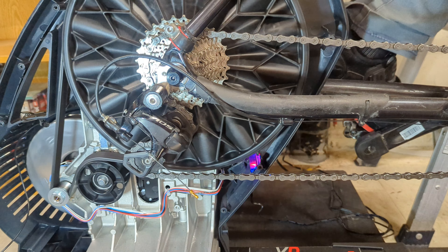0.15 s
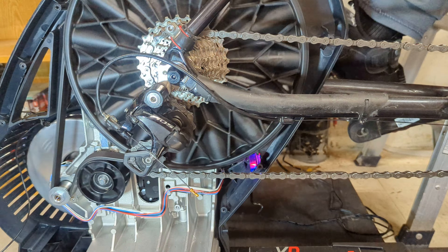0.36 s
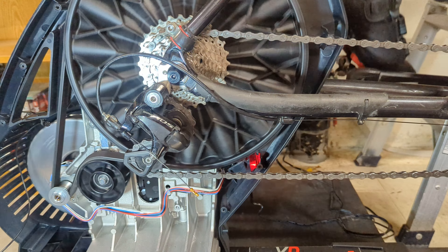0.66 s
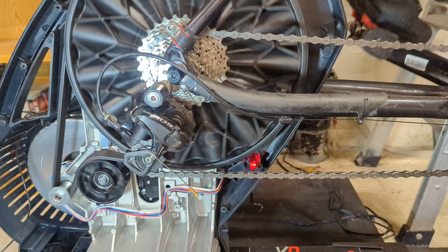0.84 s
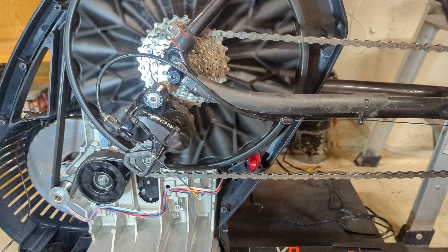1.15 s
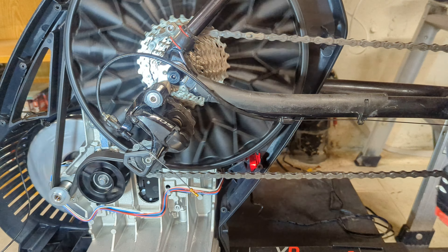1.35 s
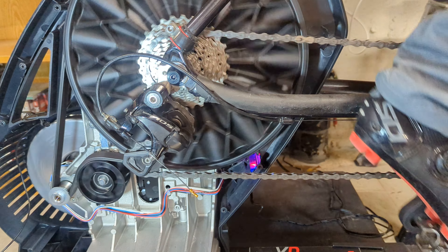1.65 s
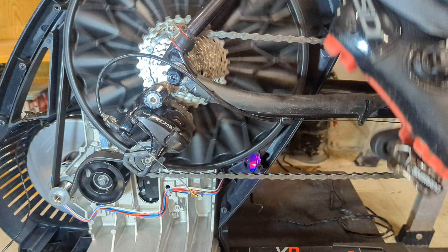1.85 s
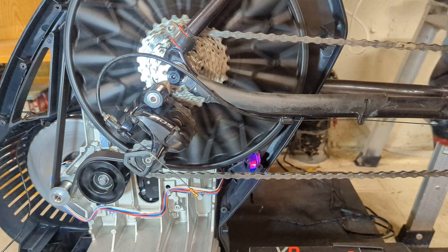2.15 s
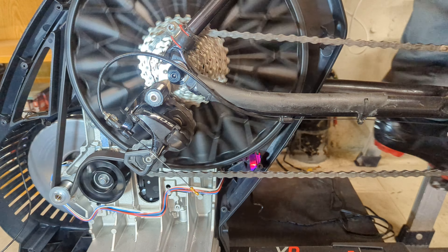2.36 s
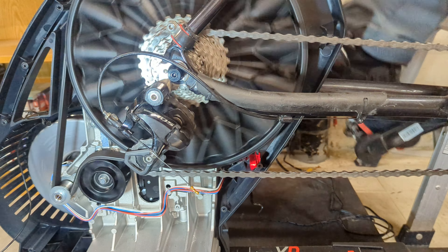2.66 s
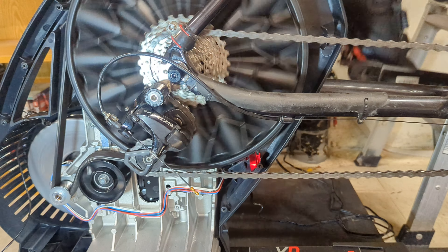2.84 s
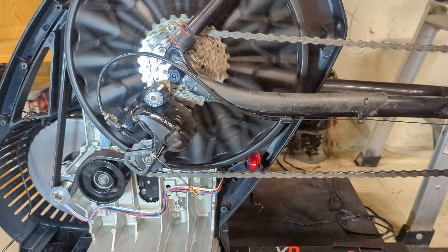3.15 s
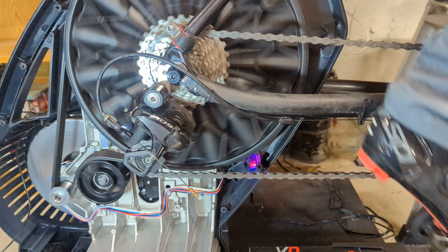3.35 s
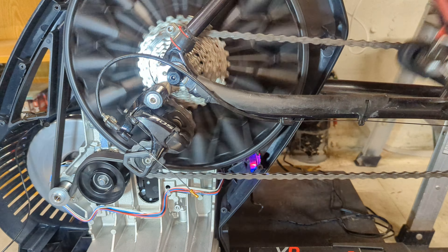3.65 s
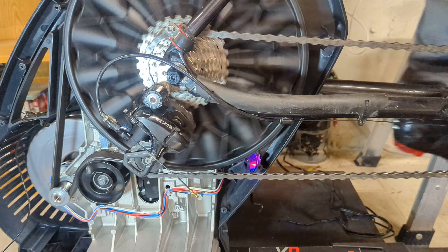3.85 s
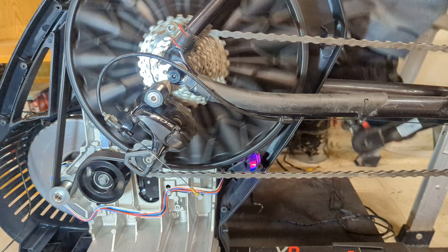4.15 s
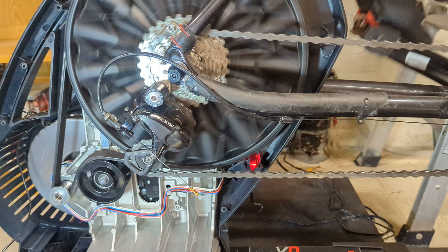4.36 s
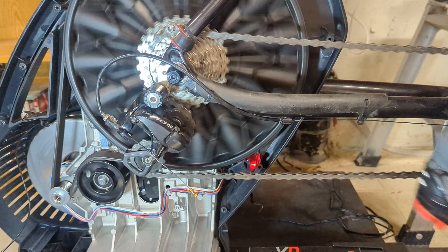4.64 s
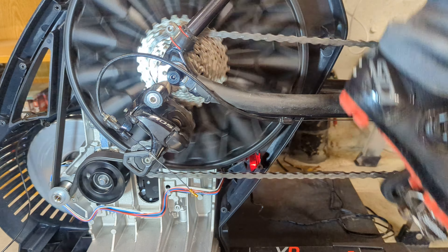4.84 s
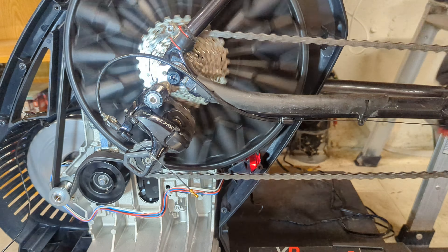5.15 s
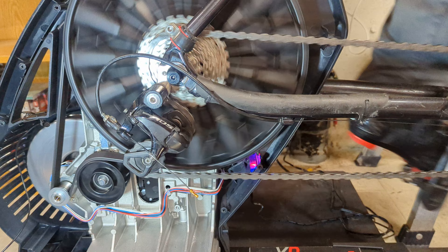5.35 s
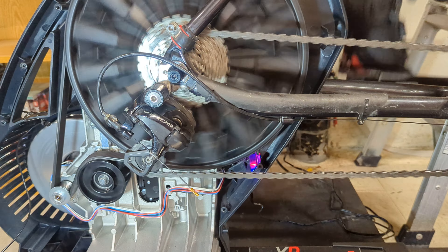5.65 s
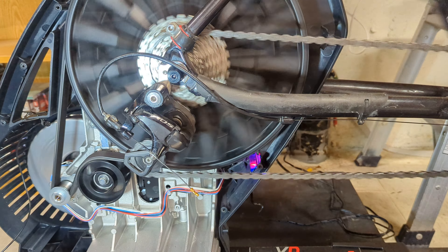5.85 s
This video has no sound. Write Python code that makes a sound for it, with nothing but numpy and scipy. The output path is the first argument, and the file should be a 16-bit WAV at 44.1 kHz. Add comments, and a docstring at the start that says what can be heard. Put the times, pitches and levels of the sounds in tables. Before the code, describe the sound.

Close to the rear drive of a stationary bicycle indoors: a cluster of hard clacks and a metallic crack open over faint air noise. Grinding fades in, surges unevenly and settles into a steady, grainy whirr. Muffled double knocks come around five a second, among chain clinks, tiny ticks and brief squeaks, with short room reflections.

```python
"""A small room, where a bicycle stands on a direct-drive trainer. The pedal clacks as a shoe finds it and the
chain takes up, then the flywheel gathers speed. Belt and chain grind: random contacts excite the resonances of
the housing. The drive knocks softly as damped modes with a rebound; the chain clinks and ticks on the sprockets
and rustles as coloured noise. The frame drones as a narrow resonance, dry metal squeaks briefly as a wavering
tone, and faint air noise and a steady hum lie beneath."""
import sys
import numpy as np
from scipy import signal
from scipy.fft import rfft, irfft
from scipy.io import wavfile

SR = 44100
rng = np.random.default_rng(int(sys.argv[2]) if len(sys.argv) > 2 else 0)


def store_wav(level_fs):
    """Save 16-bit WAV to argv[1]."""
    pcm = np.round(np.clip(np.atleast_2d(level_fs), -1, 1) * 32767)
    wavfile.write(sys.argv[1], SR, pcm.T.astype(np.int16))


N = 264600
TIME = np.arange(N) / SR
SHORT = TIME[:SR // 2]   # half a second, the span of every impulse response
CUTOFF_HZ = 7050   # upper edge of the sound's band

# knocks of the drive, about five a second at speed, plus the thuds that lead into the clacks at 2.04 s and 3.10
# s: start_s, level_db, hollow_overtone_db, rebound_after_s
KNOCK_EVENTS = [(1.202, -47.5, -44.5, 0.02), (1.442, -44, -53.5, .021), (1.785, -32.5, -39.5, 0.019),
                (1.846, -38.5, -46, 0.019), (2.035, -26.5, -25.5, 0.04), (2.131, -36.5, -41, 0.018),
                (2.318, -33, -52.5, 0.017), (2.802, -34, -43, 0.029), (3.097, -27, -27, .021),
                (3.245, -40, -39, .015), (3.427, -44.5, -58, 0.019), (3.627, -32.5, -44, 0.037),
                (3.834, -32, -47, .019), (4.016, -37.5, -58, 0.019), (4.224, -37, -52, 0.018),
                (4.405, -30.5, -50, 0.018), (4.585, -33, -53, 0.022), (4.786, -38, -60, 0.019),
                (4.986, -41, -44, 0.019), (5.126, -31, -40, .021), (5.169, -31, -34.5, 0.017),
                (5.359, -31.5, -43.5, 0.022), (5.504, -37, -46, 0.019), (5.542, -30.5, -37.5, 0.036),
                (5.888, -35, -45, .021), (5.909, -35.5, -38, 0.014)]


def from_db(db):
    """Decibels to amplitude gain: 20 dB per factor of ten."""
    return 10 ** (np.asarray(db) / 20)


def rms_one(x):
    """Normalisation to unit mean power."""
    return x / np.sqrt(np.mean(x ** 2) + 1e-20)


def at_hz(points, hz):
    """Linear interpolation of a curve on a log-frequency axis."""
    f, value = np.transpose(points)
    return np.interp(np.log(np.maximum(hz, 1)), np.log(f), value)


def coloured(x, spectrum):
    """Spectral shaping: each frequency is weighted by a smooth curve, then the rms is set to 1."""
    hz = np.fft.rfftfreq(len(x), 1 / SR)
    gain = from_db(at_hz(spectrum, hz)) * (hz < CUTOFF_HZ + 500)
    return rms_one(irfft(rfft(x) * gain, len(x)))


def drift(rate_hz):
    """Low-passed random fluctuation of rms 1, its amplitude response halved at rate_hz."""
    hz = np.fft.rfftfreq(N, 1 / SR)
    return rms_one(irfft(rfft(rng.standard_normal(N)) / (1 + (hz / rate_hz) ** 2), N))


def dying(t60):
    """Exponential decay by 60 dB in t60 seconds."""
    return np.exp(-np.log(1000) * SHORT / max(t60, 1e-3))


def swell(s, length_s):
    """Gaussian rise and fall around a moment, down to 1/e at length_s either side."""
    return np.exp(-((TIME - s) / length_s) ** 2)


def clicks(times, db):
    """Ideal impact: one impulse per contact."""
    out = np.zeros(N)
    np.add.at(out, np.round(np.asarray(times) * SR).astype(int), from_db(db))
    return out


def grains(per_s, spread_db):
    """Random impulse train: small contacts at chance moments, uneven in size and of either sign."""
    sizes = from_db(spread_db * np.minimum(rng.exponential(1, N), 4)) * rng.choice([-1, 1], N)
    return rms_one(sizes * (rng.random(N) < per_s / SR))


def through(x, response):
    """Linear system: convolution of a signal with an impulse response."""
    return signal.oaconvolve(x, response)[:N]


def room(x, wet_db, t60=0.5):
    """Reverberation: direct sound plus a dense decaying tail that begins after 5 ms."""
    tail = rng.standard_normal(SR // 2) * dying(t60) * (SHORT > .005)
    return x + from_db(wet_db) * through(x, tail / np.linalg.norm(tail))


def ringing(modes):
    """Modal superposition: the decaying sines of a struck part, alternating in sign."""
    out = 0
    for k, (hz, db, t60) in enumerate(modes):
        out = out + (-1) ** k * from_db(db) * dying(t60) * np.sin(2 * np.pi * hz * SHORT)
    return out


def struck(times, levels_db, modes, uneven_db, detune):
    """Modal excitation: each blow feeds the modes in its own proportions and at slightly shifted pitches."""
    out = np.zeros(N + SR // 2)
    for s, level_db in zip(times, levels_db):
        chance = rng.standard_normal((len(modes), 2))
        blow = [(hz * (1 + detune * a), db + level_db + uneven_db * b, t60)
                for (hz, db, t60), (a, b) in zip(modes, chance)]
        start = round(s * SR)
        out[start:start + SR // 2] += ringing(blow)
    return out[:N]


def still_room():
    """Stationary background: coloured air noise and a sum of steady hum tones."""
    # air noise spectrum: pitch_hz, level_db
    still_air = [(25, -9.5), (60, 2), (100, -14), (170, -26.5), (260, 4), (400, -12.5), (1000, -7),
                 (2500, -29), (7000, -48.5)]
    # steady hum: pitch_hz, rms_db
    hum_tones = [(59, -76), (150, -71), (243, -71)]
    hum = sum(np.sqrt(2) * from_db(db) * np.sin(2 * np.pi * (hz * TIME + rng.random()))
              for hz, db in hum_tones)
    return hum + from_db(-61.5) * coloured(rng.standard_normal(N), still_air)


def drone(effort_db):
    """Narrow-band resonance: the flywheel keeps the frame murmuring; now and then it swells into a clear tone."""
    # swells of the frame resonance: centre_s, length_s (before scaling), pitch_hz, level_db
    frame_swells = [(0.007, 0.098, 148, -54), (1.217, 0.037, 149, -56.5), (2.143, 0.089, 149, -45.5),
                    (2.366, 0.062, 145.3, -55), (2.675, 0.043, 152, -49.5), (3.662, 0.06, 150, -52.5),
                    (3.772, 0.034, 140.7, -48), (3.844, .04, 141, -47.5), (3.978, 0.042, 143, -50.5),
                    (4.12, 0.045, 142.5, -50.5), (4.62, 0.039, 140.3, -50.5), (4.792, .08, 144, -49),
                    (5.124, 0.062, 140.5, -46.5), (5.66, 0.2, 152.4, -51)]
    centre_hz, width_hz = 146.8, 6.1
    level_db, follows = -66, 1   # level at zero effort; dB per dB of effort
    phase = 2 * np.pi * centre_hz * TIME
    # two independent drifts in quadrature make a narrow band of noise
    murmur = drift(width_hz) * np.sin(phase) + drift(width_hz) * np.cos(phase)
    tones = 0
    for s, length_s, hz, db in frame_swells:
        tone = np.sin(2 * np.pi * (hz * TIME + rng.random()))
        tones = tones + from_db(db) * swell(s, 0.72 * length_s) * tone
    return from_db(level_db + follows * effort_db) * murmur + np.sqrt(2) * tones


def rattle(gap_s=0.014, length_s=0.015):
    """Repeated impact: loose parts bounce in unevenly spaced aftershocks; an envelope of mean power 1."""
    moments = np.cumsum(rng.uniform(.4, 1.6, size=60) * gap_s)
    age = SHORT - np.r_[0, moments][np.searchsorted(moments, SHORT)]
    return rms_one(.5 + np.exp(-age / length_s))


def clack_colour(hz, thud_db, crack_db, brightness):
    """Contact spectrum: a thud below, a crack above, tilted by the hardness of the contact."""
    # colour common to all clacks: pitch_hz, level_db
    clack_trim = [(35, -2), (120, -2), (200, -7), (400, -7), (650, -7), (1100, -3), (1600, -3.5),
                  (2200, -4), (3200, -2), (4500, -12), (6300, -22.5)]
    thud_top_hz, crack_foot_hz, pivot_hz = 330, 1080, 2720   # thud gives way to crack between the first two
    thud_db_per_octave, crack_db_per_octave = 5.5, -6
    thud = thud_db + thud_db_per_octave * min(np.log2(hz / thud_top_hz), 0)
    khz_above = (hz - pivot_hz) / 1000
    crack = crack_db + crack_db_per_octave * np.log2(hz / pivot_hz) + brightness * khz_above
    return at_hz([(thud_top_hz, thud), (crack_foot_hz, crack)], hz) + at_hz(clack_trim, hz)


def frame_ring(s, thud_db, thud_hz):
    """Selective modal excitation: where a blow lands decides which frame modes ring most."""
    # ringing of the frame: pitch_hz, level_db, t60_s
    frame_modes = [(45.2, -17.5, 0.25), (74, -25.5, 0.24), (102, -12.5, 0.43), (164, -14, 0.27),
                   (206, -7, 0.15), (279.4, -2.5, 0.15), (385.7, 0, 0.067), (425, -3.5, 0.048),
                   (462.5, -10, 0.13), (505, -8, 0.035), (580, -18, 0.097)]
    off_pitch_db_per_octave = -11   # modes far from the thud's pitch ring less
    modes = [(hz, db + off_pitch_db_per_octave * abs(np.log2(hz / thud_hz)), t60)
             for hz, db, t60 in frame_modes]
    return struck([s], [thud_db + 0.5], modes, uneven_db=2.0, detune=0.022)


def clacks():
    """Broadband impact: each hard contact is a short crack, a rattling tail and the ring of frame and metal."""
    # pedal and frame contacts: start_s, thud_db, thud_pitch_hz, crack_db, brightness_db_per_khz
    contacts = [(0.076, -41, 170, -43.5, -6), (0.092, -35, 170, -40, -4), (0.101, -24.5, 420, -39.5, -0.5),
                (0.11, -23.5, 450, -29, -1), (0.135, -26.5, 423, -32.5, 0),
                (0.293, -20.5, 400, -27.5, -0.5), (0.3, -30, 270, -57, 10.5),
                (0.702, -53, 400, -57.5, -5.5), (1.499, -27.5, 185, -53, -8), (1.544, -44, 404, -53, -4),
                (2.04, -23.5, 280, -23, -2), (2.046, -17.5, 373, -32, 5.5), (3.104, -20, 209, -20.5, 4.5)]
    # decay of the first crack: pitch_hz, t60_s
    crack_t60 = [(60, 0.3), (300, 0.01), (1000, 0.038), (2600, 0.034), (6000, 0.063)]
    # level of the tail against the crack: pitch_hz, level_db
    tail_level = [(60, -16.5), (300, -2), (700, -4), (1300, -9.5), (2800, -10.5), (6000, -10.5)]
    # decay of the tail: pitch_hz, t60_s
    tail_t60 = [(60, 0.29), (300, 0.21), (1000, 0.12), (2600, 0.26), (6000, 0.23)]
    # ringing of crank, chain and sprockets: pitch_hz, level_db, t60_s
    metal_modes = [(1230, -3.5, 0.048), (1256, -52, 0.027), (1970, -23.5, 0.073), (2250, 5.5, 0.052),
                   (2574, 11.5, 0.019), (3120, -1.5, 0.05), (3510, -16, 0.014), (4060, -3, 0.05),
                   (3880, -40.5, 0.047)]
    out = np.zeros(N)
    shakes = [rattle() for row in contacts]
    edges = np.geomspace(28, 7000, 17)
    for low, high in zip(edges, edges[1:]):
        hz = np.sqrt(low * high)
        skirt = signal.butter(2, 1.3 * high, fs=SR, output="sos")   # steepens the upper edge
        band = np.vstack([signal.butter(2, [low, high], "band", fs=SR, output="sos"), skirt])
        crack = dying(at_hz(crack_t60, hz))
        tail = from_db(at_hz(tail_level, hz)) * dying(at_hz(tail_t60, hz))
        for (s, thud_db, _, crack_db, brightness), shake in zip(contacts, shakes):
            envelope = np.hypot(crack, tail * shake)
            burst = signal.sosfilt(band, rng.standard_normal(SR // 2) * envelope)
            burst /= np.sqrt(np.sum(burst ** 2) / (.02 * SR))   # energy of 20 ms at rms 1
            start = round(s * SR)
            gain = from_db(clack_colour(hz, thud_db, crack_db, brightness) - 11)
            out[start:start + SR // 2] += gain * burst
    # the thud shakes the frame; the crack rings the metal
    s, thud_db, thud_hz, crack_db, _ = np.transpose(contacts)
    frame = sum(map(frame_ring, s, thud_db, thud_hz))
    metal = struck(s, crack_db - 8, metal_modes, uneven_db=2.5, detune=0.013)
    return out + frame + metal


def surging(drive_db):
    """Power addition in dB: the steady drive, moments of harder rubbing and a jolt after each knock."""
    # the belt rubs harder for a moment: centre_s, length_s (before scaling), grinding_db
    surges = [(0.669, 0.014, -55.5), (0.716, 0.019, -56.5), (0.9, 0.016, -52.5), (1.071, 0.049, -48),
              (1.244, 0.07, -53), (1.363, 0.039, -46.5), (1.806, .06, -57), (1.923, 0.036, -53.5),
              (4.446, 0.21, -48)]
    jolt_db, jolt_lag_s, jolt_s = -22.5, 0.018, 0.026   # each knock shakes the belt; dB against its level
    rubs = sum((from_db(db) * swell(s, 0.81 * length_s)) ** 2 for s, length_s, db in surges)
    jolts = sum((from_db(db + jolt_db) * swell(s + jolt_lag_s, jolt_s)) ** 2
                for s, db, *_ in KNOCK_EVENTS)
    return 10 * np.log10(from_db(drive_db) ** 2 + rubs + jolts)


def grinding(grind_db):
    """Source and filter: belt teeth and chain rollers patter on the housing, whose resonances whirr grittily."""
    # resonances of the housing: pitch_hz, width_hz, level_db
    housing = [(267, 34, 1), (436, 44, 0), (689, 91, 3), (793, 89, 3.5), (995, 115, 5.5), (1139, 64.5, 5.5),
               (1338, 166, 4.5), (1913, 88, -7), (2150, 110, -39.5), (2590, 130, -11), (2740, 120, -14)]
    # spectrum of the low rumble: pitch_hz, level_db
    rumble_colour = [(20, -3.5), (45, -2), (60, 10), (80, 9), (110, 20.5), (200, 16), (400, 8),
                     (800, -25.5)]
    contacts = room(grains(per_s=1600, spread_db=2.5), wet_db=-4.0) * from_db(0.91 * drift(74))
    whirr = 0
    for k, (hz, width, db) in enumerate(housing):
        b, a = signal.iirpeak(hz, hz / width, SR)
        # the contact point wanders, so each resonance is fed unevenly
        uneven = from_db(db + 2.55 * drift(14))
        whirr = whirr + (-1) ** k * uneven * signal.lfilter(b, a, contacts)
    whirr = signal.sosfilt(signal.butter(4, 3100, fs=SR, output="sos"), whirr)
    rumble = coloured(rng.standard_normal(N), rumble_colour)
    return from_db(grind_db) * (from_db(0.73) * rms_one(whirr) + from_db(-18.5) * rumble)


def chain_hiss(effort_db):
    """Modulated noise: pins and plates rustle in quick, uneven little bursts, more as the drive speeds up."""
    # spectrum of the rustle: pitch_hz, level_db
    hiss = [(1500, 11), (2600, 10.5), (3350, 0.5), (3600, -0.5), (3850, -4.5), (4300, -0.5), (4900, -10.5),
            (5900, -5.5), (6500, -16), (7100, -25.5)]
    level_db, follows = -62, 1.2   # level at zero effort; dB per dB of effort
    rustle = room(grains(per_s=1000, spread_db=-1.0) * from_db(2.4 * drift(42)), wet_db=-4.5)
    return from_db(level_db + follows * effort_db) * coloured(rustle, hiss)


def chain_contacts(effort_db):
    """Impact radiation: links seat on the teeth with a short clink; the derailleur cage adds bright ticks."""
    # links seating hard on the sprockets: start_s, level_db
    clink_events = [(0.697, -41.5), (0.863, -43.5), (0.948, -44), (1.18, -47.5), (1.204, -51), (1.258, -41),
                    (1.326, -42), (1.375, -39), (1.544, -31), (1.671, -36.5), (1.793, -29), (1.811, -28.5),
                    (1.976, -30), (1.998, -30.5), (2.955, -30), (3.038, -35.5), (3.672, -37),
                    (4.356, -35.5), (4.491, -32), (4.973, -33), (5.445, -31.5)]
    # ringing of the clinks: pitch_hz, level_db, t60_s
    clink_modes = [(886, -8.5, 0.035), (1068, 1.5, 0.036), (1161, -11.5, 0.1), (1470, -23, 0.04)]
    # sharper ticks of the chain in the derailleur: start_s, level_db
    tick_events = [(0.8829, -63), (1.063, -55), (1.3022, -55), (1.3255, -48.5), (1.633, -53), (1.937, -50),
                   (2, -52), (2.191, -49), (2.535, -51), (2.628, -53.5), (3.2655, -49.5), (3.333, -47),
                   (3.9276, -52), (4.0255, -51), (5.287, -50)]
    # spectrum of a tick: pitch_hz, level_db
    tick_colour = [(800, -10), (2000, -2.5), (3500, 5), (4400, 5.5), (5000, 1), (6200, 6), (7200, -25.5)]
    s, db = np.transpose(clink_events)
    clinks = struck(s, db - 0.5, clink_modes, uneven_db=0.0, detune=0.06)
    # the sprocket's main resonance takes a few cycles to build up
    clinks = signal.lfilter(*signal.iirpeak(1070, 2.2, SR), clinks)
    # lighter ticks at random: rate and mean level at zero effort, dB per dB of effort
    strays_per_s, stray_level_db, stray_follows = 14, -58.5, 0.42
    stray_db = stray_level_db + stray_follows * effort_db + 4.0 * rng.standard_normal(N)
    strays = from_db(stray_db) * (rng.random(N) < strays_per_s * from_db(effort_db) / SR)
    cage = from_db(-7.5) * coloured(rng.standard_normal(SR // 2), tick_colour) * dying(0.044)
    ticks = through(clicks(*np.transpose(tick_events)) + strays, cage)
    return room(clinks, wet_db=-6.5) + room(ticks, wet_db=-13.5)


def knocks(rebound_db=-6.0, hollow_ring_db=3.0):
    """Damped modes of a shell: play in the drive thumps the plastic, then a weaker rebound follows."""
    # ringing of the thump: pitch_hz, level_db, t60_s
    knock_modes = [(224.3, -6, 0.082), (287.2, 5, 0.072), (352.4, -1.5, 0.016), (437.4, -16, 0.34)]
    # ringing of the hollow overtone: pitch_hz, level_db, t60_s
    hollow_modes = [(576, -5, 0.038), (701, 0, 0.052), (847, -10, 0.15)]
    s, level_db, hollow_db, rebound_s = np.transpose(KNOCK_EVENTS)
    thumps = hollow = 0
    for times, loss_db in ((s, 0), (s + rebound_s, rebound_db)):
        thumps = thumps + struck(times, level_db + loss_db, knock_modes, uneven_db=2.0, detune=0.021)
        overtone_db = hollow_db + loss_db + hollow_ring_db
        hollow = hollow + struck(times, overtone_db, hollow_modes, uneven_db=2.0, detune=0.1)
    # the small shell radiates no deep bass, the soft contact no treble
    shell = signal.butter(2, [141, 1400], "band", fs=SR, output="sos")
    return room(signal.sosfilt(shell, thumps + hollow), wet_db=-11)


def squeaks(width_s=0.0051):
    """Frequency modulation: dry metal slips for a moment, a rough, wavering tone that swells and stops."""
    # brief metallic squeaks: centre_s, pitch_hz, level_db
    slips = [(1.347, 1500, -47.5), (1.495, 2480, -45.5), (3.231, 1450, -39.5), (5.733, 1460, -37.5)]
    waver = 1 + .06 * drift(300)
    out = 0
    for s, hz, db in slips:
        tone = np.sin(2 * np.pi * np.cumsum(hz * waver) / SR)
        out = out + from_db(db) * swell(s, width_s) * tone
    return out


def scene():
    """Superposition: one effort curve drives grinding, rustle, stray ticks and drone; the rest is added on top."""
    # effort of the drive as the flywheel gathers speed: time_s, grinding_db
    drive = [(0, -69), (0.25, -87), (0.5, -70), (0.75, -61.5), (1.0, -57), (1.15, -58.5), (1.65, -53.5),
             (2.25, -50.5), (2.7, -49.5), (3.0, -48), (3.3, -49), (3.7, -46), (4.4, -48), (4.7, -47.5),
             (6, -46.5)]
    drive_db = np.interp(TIME, *np.transpose(drive))
    effort_db = drive_db + 49   # zero effort is grinding at -49 dB, near full speed
    running = drone(effort_db) + grinding(surging(drive_db)) + chain_hiss(effort_db) + chain_contacts(effort_db)
    return (still_room() + running + clacks() + knocks() + room(squeaks(), wet_db=-10.0))[None]


def record(dry):
    """Band limitation: a steep low-pass; nothing sounds above about 7 kHz."""
    return signal.sosfilt(signal.ellip(10, .3, 70, CUTOFF_HZ, fs=SR, output="sos"), dry)


dry = scene()
out = record(dry)
store_wav(out)
```